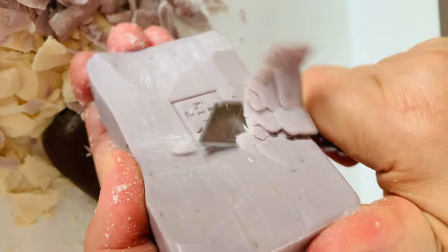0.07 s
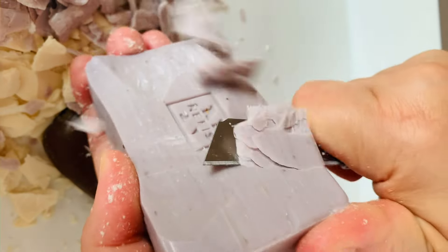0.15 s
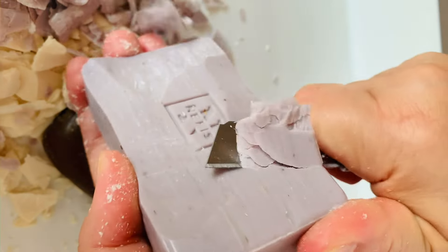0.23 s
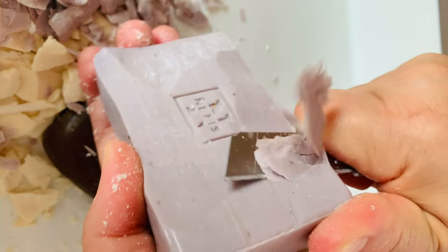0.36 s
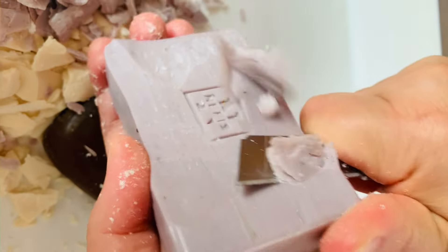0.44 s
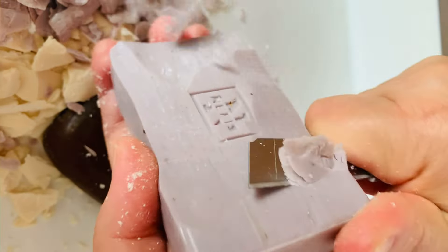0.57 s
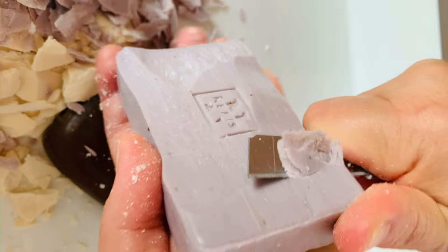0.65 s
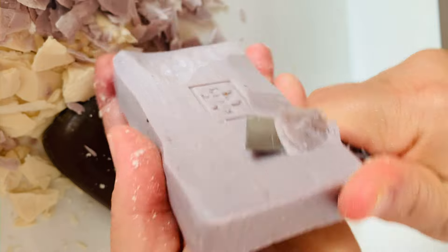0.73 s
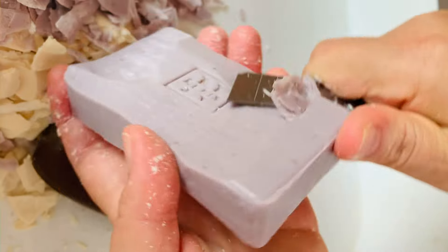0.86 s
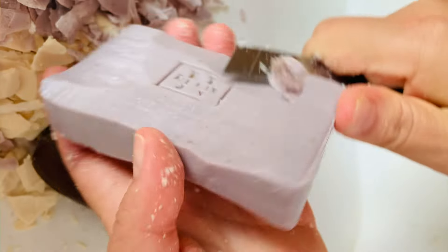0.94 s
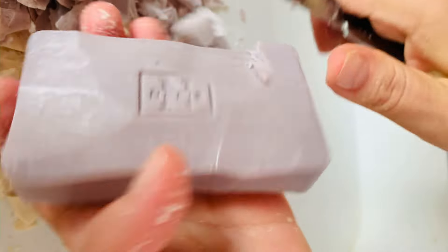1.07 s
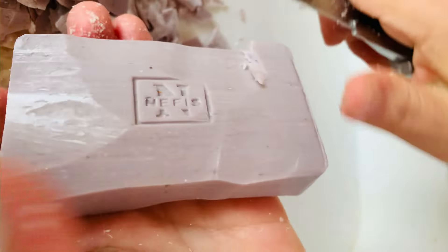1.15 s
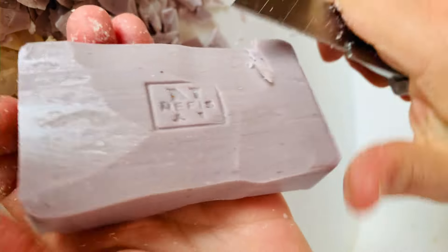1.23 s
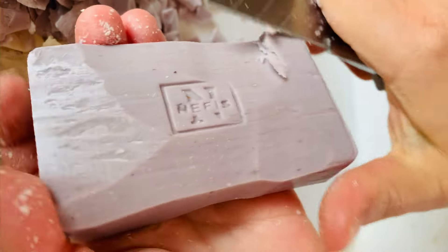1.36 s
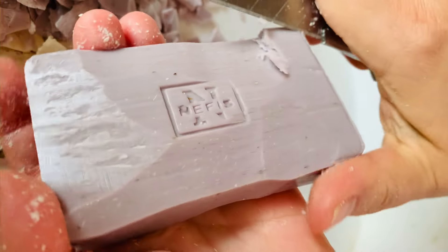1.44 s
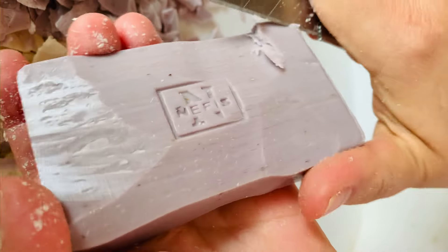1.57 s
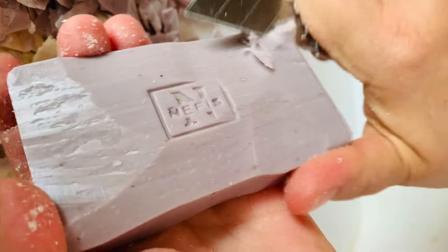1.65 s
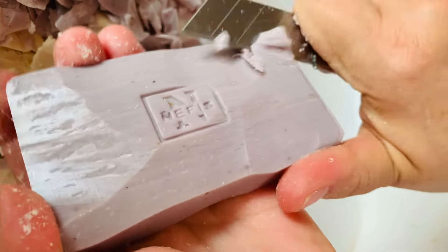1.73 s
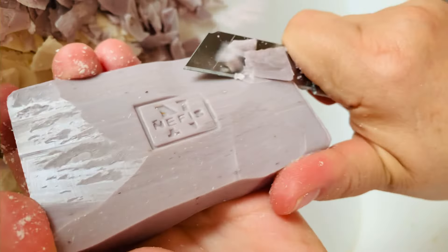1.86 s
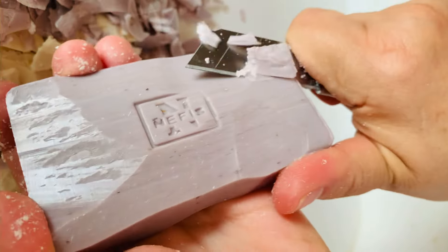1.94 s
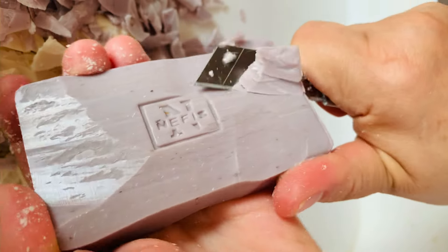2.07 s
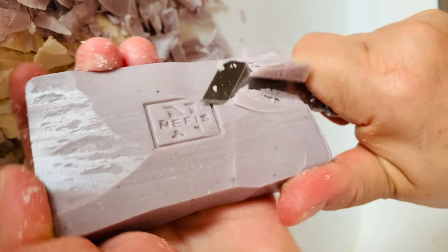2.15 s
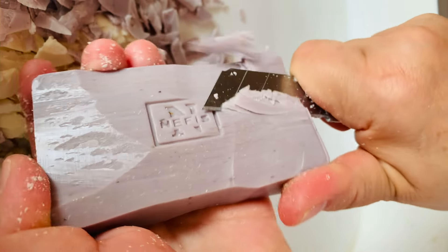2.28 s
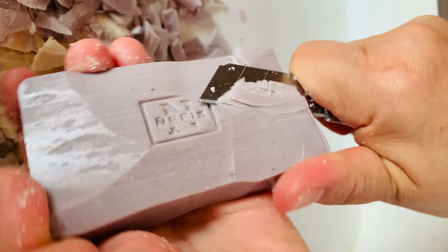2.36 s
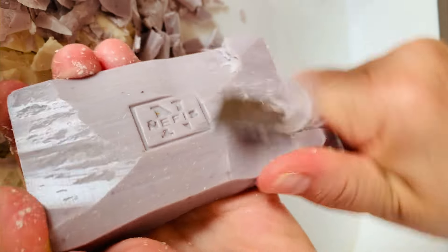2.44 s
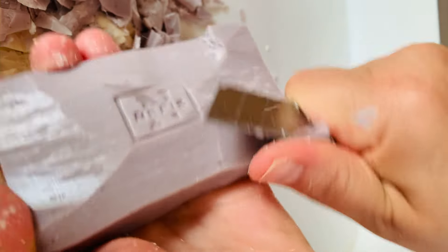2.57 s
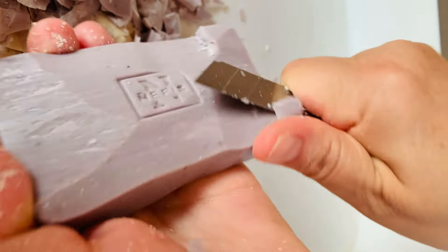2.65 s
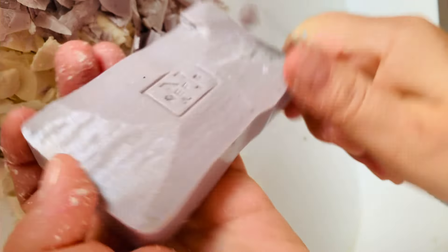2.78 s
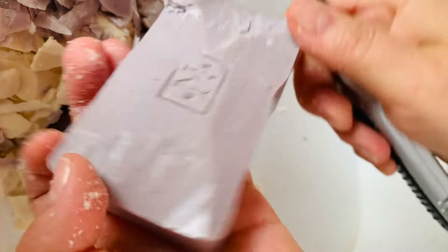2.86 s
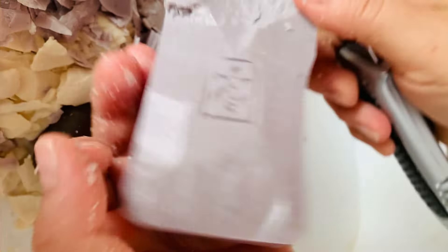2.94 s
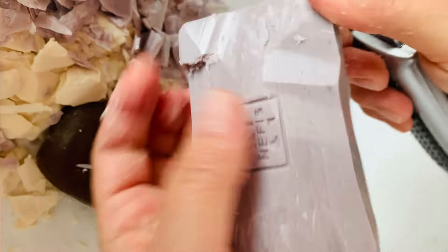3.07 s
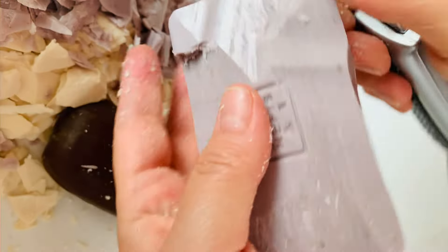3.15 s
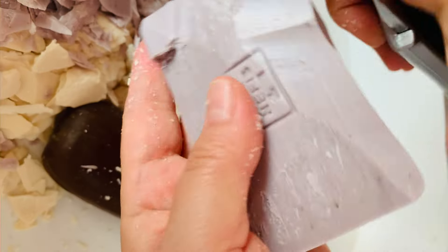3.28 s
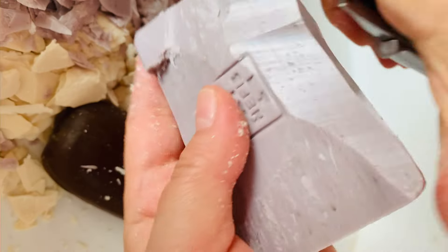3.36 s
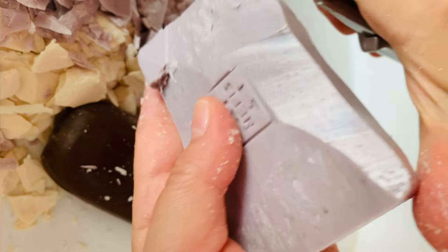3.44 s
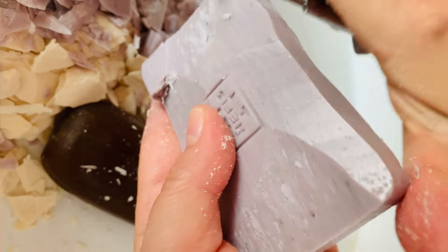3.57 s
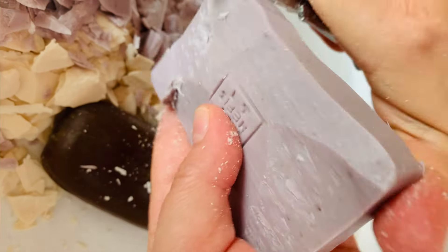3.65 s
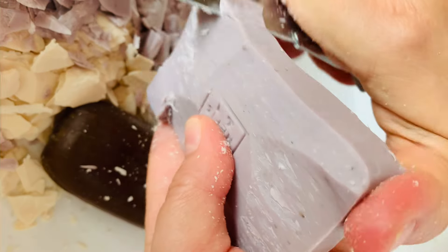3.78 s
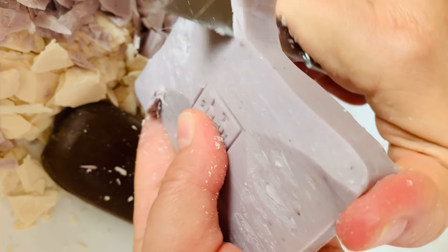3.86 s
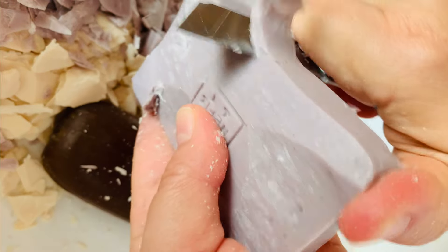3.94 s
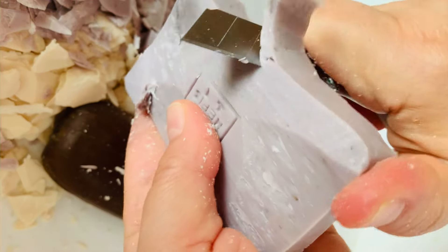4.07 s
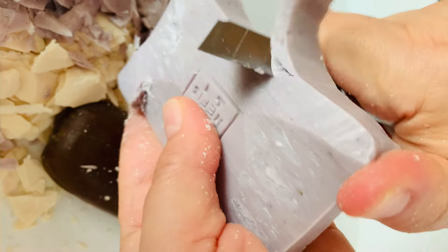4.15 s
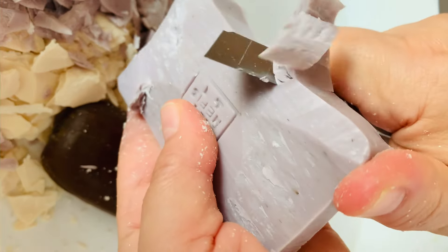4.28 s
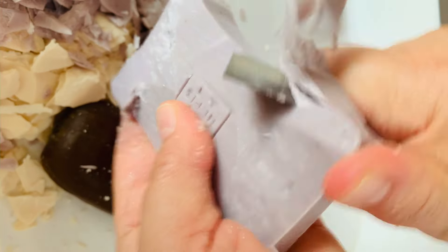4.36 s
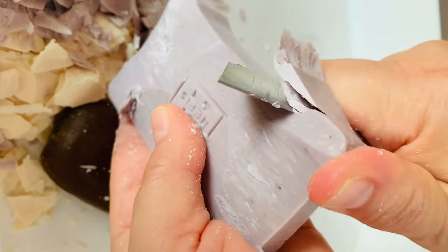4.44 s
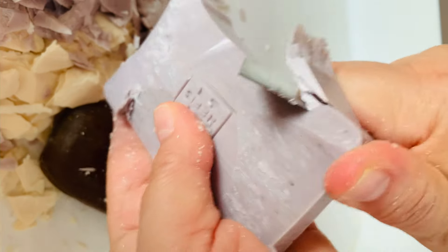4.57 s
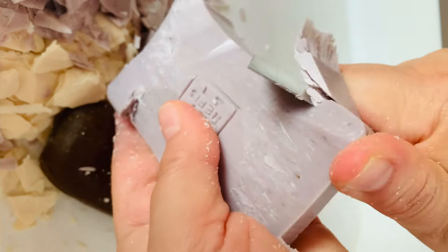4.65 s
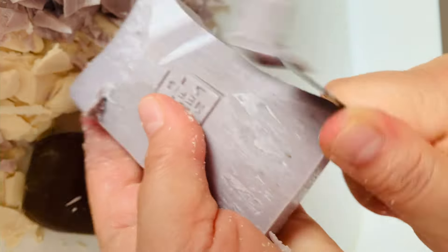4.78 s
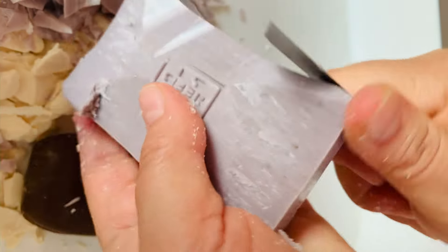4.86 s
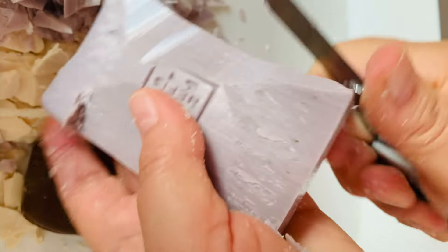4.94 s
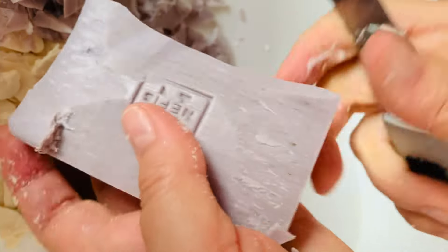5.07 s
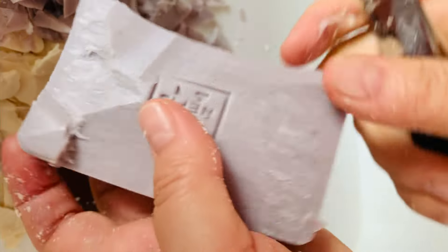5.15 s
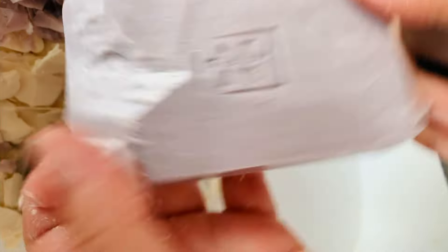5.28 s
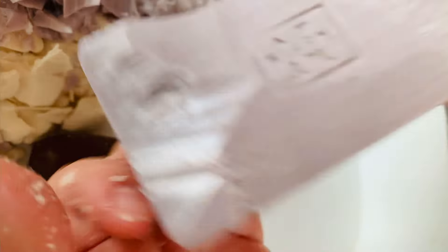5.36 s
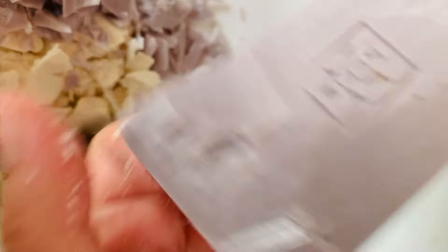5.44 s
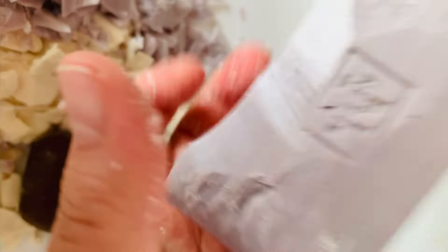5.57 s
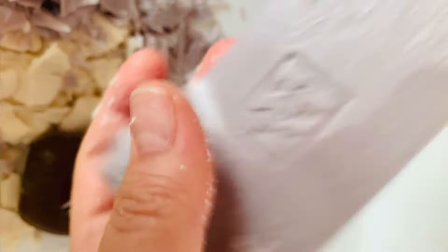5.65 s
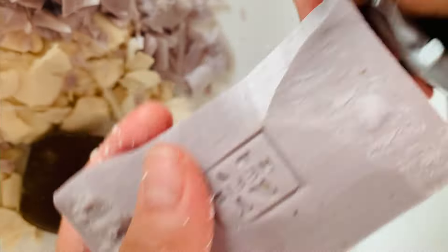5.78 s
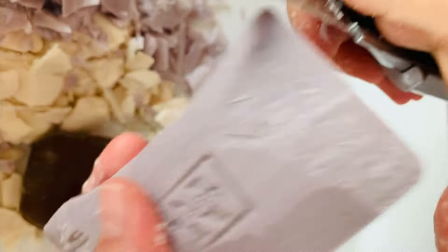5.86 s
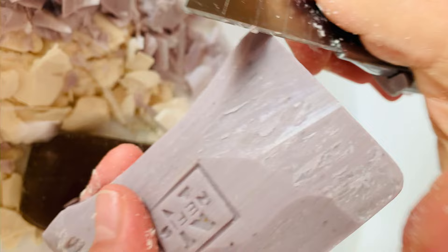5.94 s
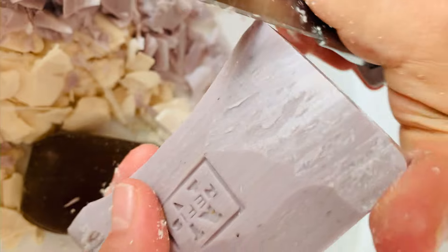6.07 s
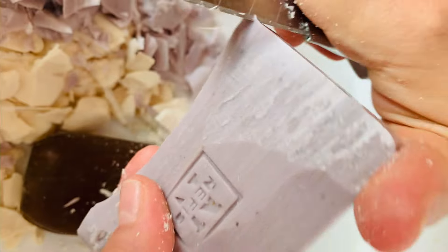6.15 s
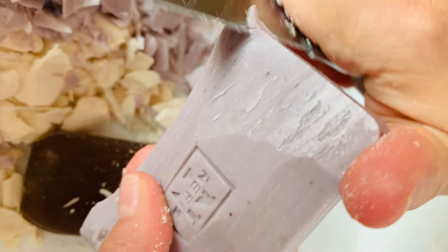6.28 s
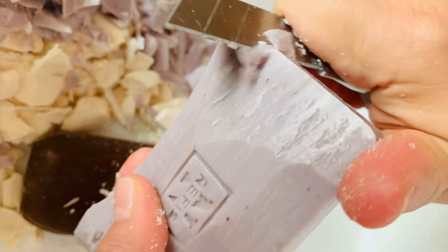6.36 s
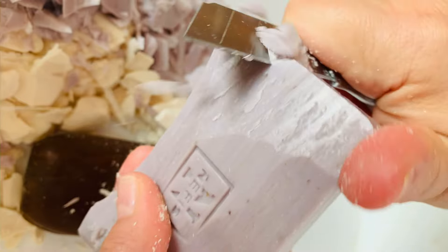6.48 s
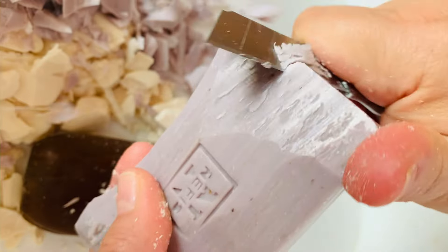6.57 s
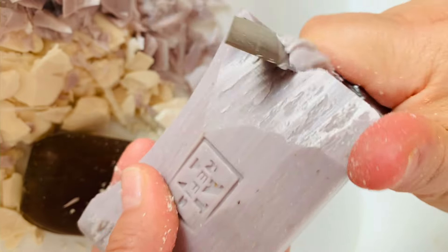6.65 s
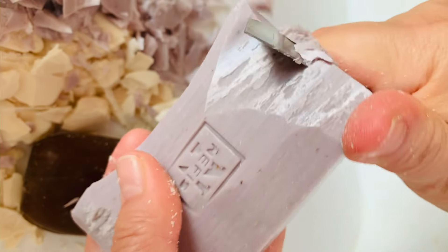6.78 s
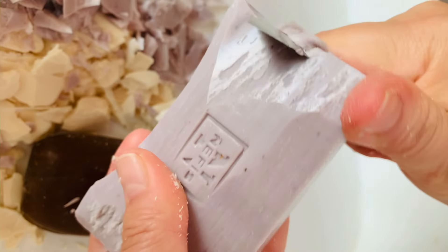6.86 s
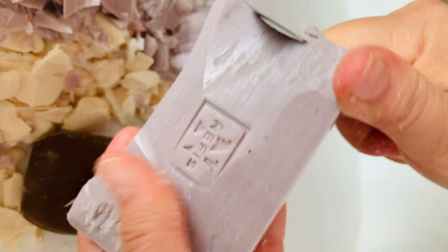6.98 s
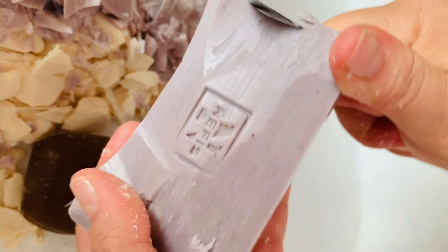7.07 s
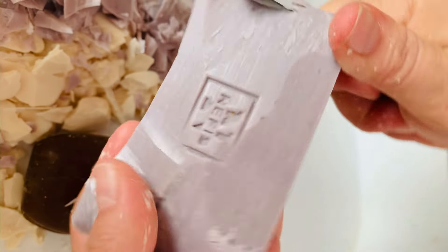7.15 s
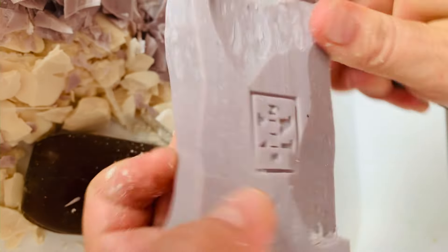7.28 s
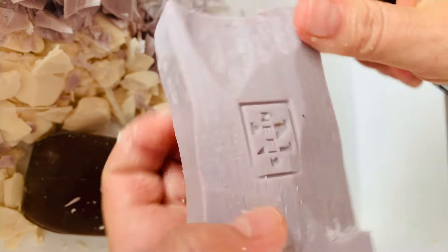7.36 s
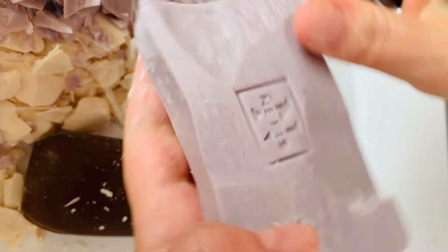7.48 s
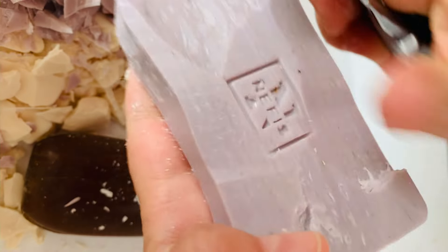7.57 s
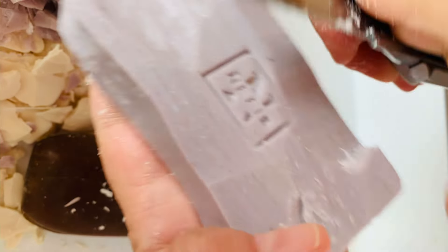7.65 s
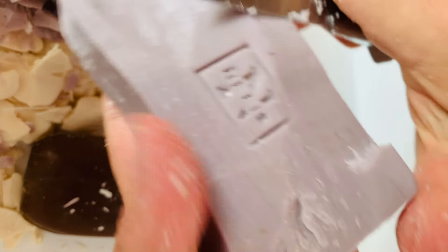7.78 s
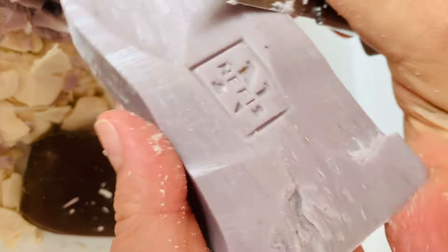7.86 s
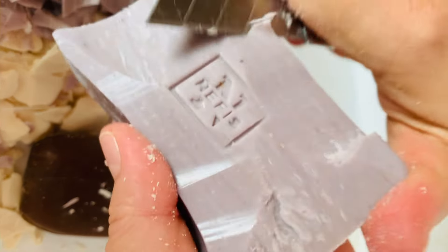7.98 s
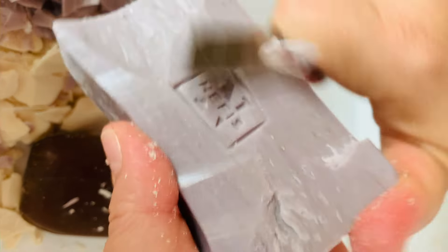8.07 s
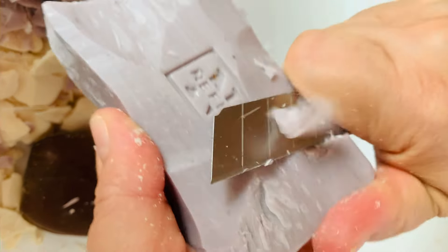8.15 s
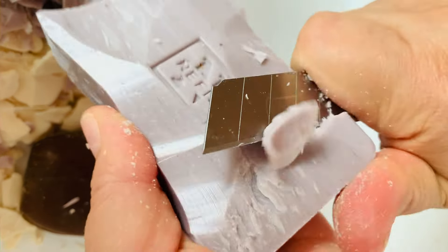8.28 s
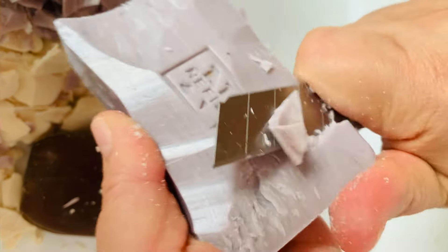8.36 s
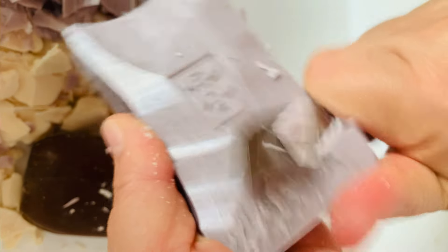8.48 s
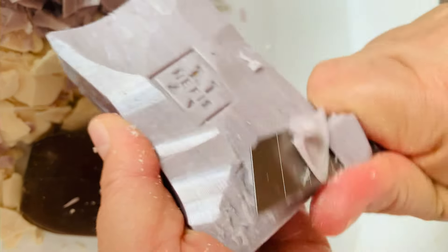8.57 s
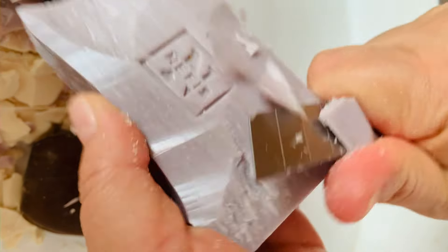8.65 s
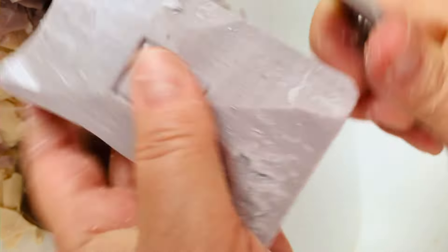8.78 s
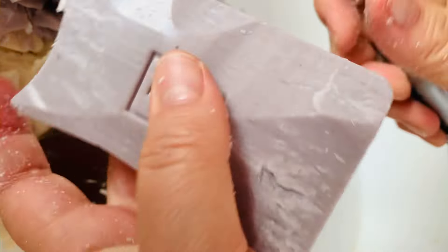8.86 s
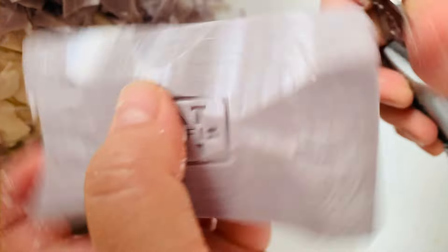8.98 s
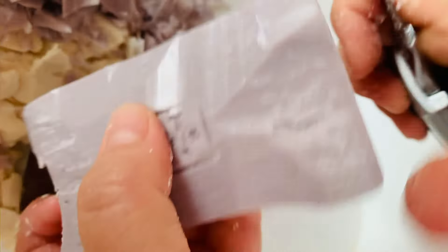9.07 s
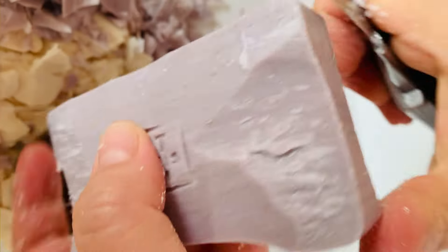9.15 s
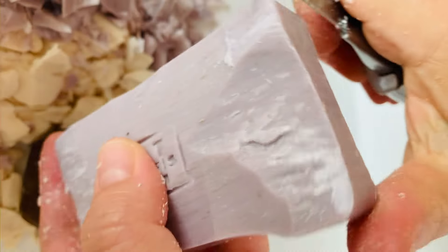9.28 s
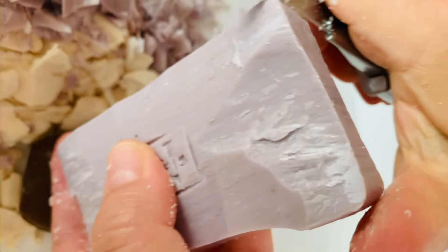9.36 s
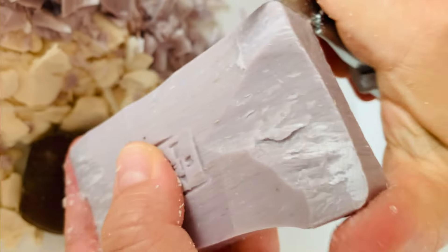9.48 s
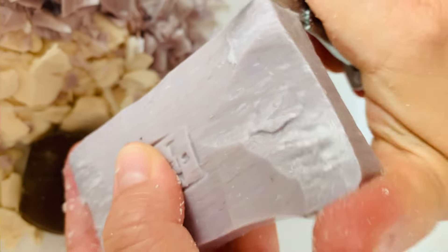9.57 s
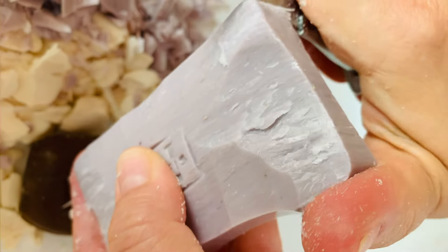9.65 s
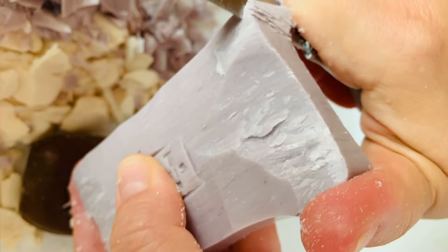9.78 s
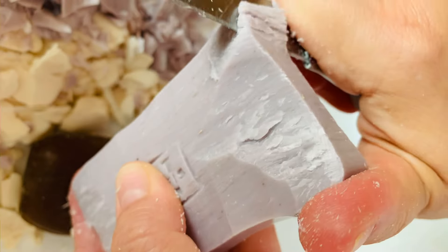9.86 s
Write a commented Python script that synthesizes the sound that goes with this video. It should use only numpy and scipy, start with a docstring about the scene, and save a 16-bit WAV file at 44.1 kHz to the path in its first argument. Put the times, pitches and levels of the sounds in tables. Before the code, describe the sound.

A thin blade scrapes and chips a dry soap bar near the microphone. Delicate crumbly ticks lead to two strong snaps before three seconds, then a cluster of brittle crunches with a deep bump. After a lull, faint crackling returns, followed by crisp breaks and a final knock. Short hard-walled reflections and soft humming air surround it.

```python
"""A knife blade shaves a dry bar of soap in a small, live room, heard by two nearby microphone ports. Grainy
noise rasps and tiny bursts pop at the edge; broken noise bursts crack as curls break off. Chunks knock with
short damped pushes, hands rustle with filtered clicks, low sine waves thump; scuffs ring the knife. A faint hum
and coloured noise fill the room, whose echoes are fading noise."""
import sys
import numpy as np
from scipy import signal
from scipy.fft import rfft, irfft
from scipy.io import wavfile
from scipy.ndimage import uniform_filter1d

SR = 44100
rng = np.random.default_rng(int(sys.argv[2]) if len(sys.argv) > 2 else 0)


def file_out(sig):
    """Save sig as 16-bit WAV at sys.argv[1]."""
    # one column per channel
    cols = np.atleast_2d(sig).T
    # limit, then scale
    lim = np.clip(cols, -1, 1)
    pcm = np.round(lim * 32767).astype(np.int16)
    wavfile.write(sys.argv[1], SR, pcm)


N = 437472
TIME, BINS = np.arange(N) / SR, np.fft.rfftfreq(N, 1 / SR)  # seconds, Hz
BLOW_SAMPLES = SR / 100  # levels of short blows are counted over 10 ms

# strokes of the blade through the soap: (start [s], length [s], rasp level before the overall trim [dB])
STROKES = [(0.084, 0.15, -71.5), (0.277, 0.18, -69.5), (0.554, 0.013, -65), (1.552, 0.091, -68.5),
           (1.678, 0.23, -73.5), (1.985, 0.042, -69.5), (2.155, 0.088, -68), (2.34, 0.079, -66),
           (2.439, 0.12, -60), (3.023, 0.081, -71), (3.841, 0.22, -69.5), (6.242, 0.081, -73),
           (6.43, 0.23, -72), (6.881, 0.035, -68), (7.74, 0.048, -67.5), (8.057, 0.029, -59.5),
           (8.599, 0.093, -73), (8.763, 0.088, -67), (9.687, 0.075, -75)]
# spectrum of breaking soap, before blade and chip shape it: (frequency [Hz], relative level [dB])
CRACK_COLOUR = [(60, -4.5), (350, -3), (900, -15), (1700, -4), (3600, -6), (5000, -1), (6600, 3), (8000, 1),
                (10500, -2), (13000, -4), (15000, -13.5), (16500, -16.5)]
# spectrum of the murmuring air: (frequency [Hz], relative level [dB])
MURMUR = [(20, -34), (35, -12), (50, 8.5), (70, -5.5), (200, -3), (280, -9.5), (560, -17.5), (900, -19.5),
          (1180, -13.5), (1900, -22.5), (2700, -29.5), (5000, -34.5), (14000, -43.5)]


def from_db(db):
    """Turns decibels into gain."""
    return 10 ** (np.asarray(db) / 20)


def read(points, hz):
    """Reads a table of (frequency [Hz], value), joining its points along a log frequency axis."""
    table_hz, value = np.transpose(points)
    return np.interp(np.log(hz + 1), np.log(table_hz + 1), value)


def unit(x):
    """Scales a signal to rms 1."""
    return x / np.sqrt(np.mean(x ** 2) + 1e-20)


def colour(x, points):
    """Filters a signal by a spectrum table and scales it to rms 1."""
    return unit(irfft(rfft(x) * from_db(read(points, BINS)), N))


def drift(per_s):
    """A random value that wanders in straight lines between 3 * per_s points a second, at rms 1."""
    knots = rng.standard_normal(int(per_s * 3 * N / SR) + 2)
    return unit(np.interp(TIME, np.linspace(0, N / SR, len(knots)), knots))


def add(mix, s, sound):
    """Mixes a sound in at time s."""
    part = mix[max(round(s * SR), 0):][:len(sound)]
    part += sound[:len(part)]


def level(rows, attack_db_per_s, release_db_per_s, resting_db):
    """Gain over time of gestures: each swells, holds and dies away to a resting level."""
    level_db = np.full(N, float(resting_db))
    for start, length, db in rows:
        swell_db = (TIME - start) * attack_db_per_s
        fade_db = (start + length - TIME) * release_db_per_s
        level_db = np.maximum(level_db, db + np.minimum(np.minimum(swell_db, fade_db), 0))
    return from_db(level_db)


def crackle(per_s, spread_db):
    """Random clicks of widely differing size, at rms 1."""
    size = from_db(spread_db * np.minimum(rng.exponential(1, N), 4))
    return unit(size * rng.choice([-1, 1], N) * (rng.random(N) < per_s / SR))


def blade(hz):
    """Gain of the thin blade's resonances, which sing under the cut."""
    # resonances: (frequency [Hz], width [Hz], strength [dB])
    blade_modes = [(6920, 1500, 5), (7150, 110, 2), (8170, 150, 5)]
    power = sum(from_db(2 * db) / (1 + (2 * (hz - f) / width) ** 2) for f, width, db in blade_modes)
    return np.sqrt(1 + power)


def background(air_db=-62.0, waver=0.93, waver_db=1.0):
    """Coloured noise makes moving air; sine waves of unsteady phase and level make the hum."""
    # hum tones: (frequency [Hz], average level [dB])
    hum_tones = [(48.6, -66), (197.5, -62.5)]
    air = from_db(air_db) * colour(rng.standard_normal(N), MURMUR)
    hum = np.zeros(N)
    for hz, db in hum_tones:
        strength = from_db(db + waver_db * drift(per_s=5.6))
        hum += strength * np.sin(2 * np.pi * hz * TIME + waver * drift(per_s=5))
    return air + np.sqrt(2) * hum


def crumbs():
    """Tiny crumbs pop off the edge, each a noise burst about a millisecond long."""
    clicks = abs(crackle(per_s=220, spread_db=3.))
    pops = signal.oaconvolve(clicks, np.exp(-TIME[:300] / .001))[:N]
    return unit(pops * rng.standard_normal(N))


def rasp(level_db=-2.5, patchy_db=4.5):
    """The edge sticks and slips through the soap; clumps of uneven grains ring the blade."""
    # spectrum of the rasp: (frequency [Hz], relative level [dB])
    rasp_colour = [(100, -26), (1000, -15), (2500, -8), (5000, -4), (6700, 3), (8500, -7.5), (11000, -9),
                   (14000, -10.5), (16000, -17.5)]
    grains = np.zeros(N)
    # each pitch band gets its own grains and clumps
    for hz in np.geomspace(1500, 15000, num=7):
        clicks = crackle(per_s=2500, spread_db=3.5)
        band = signal.butter(2, [hz / 1.3, hz * 1.3], "band", fs=SR)
        grains += signal.lfilter(*band, clicks * from_db(patchy_db * drift(per_s=10)))
    clumps = grains * from_db(3.5 * drift(per_s=40))
    ringing = irfft(rfft(clumps) * blade(BINS), N)
    # the edge bites in, slips out and then barely touches the bar
    pressure = level(STROKES, attack_db_per_s=349, release_db_per_s=218.5, resting_db=-82)
    edge = .7 * colour(ringing, rasp_colour) + .8 * colour(crumbs(), CRACK_COLOUR)
    return from_db(level_db) * pressure * edge


def small_chips(per_s=55., over_db=0.0, spread_db=3.0, length_s=0.00082, body_db=1.5, bright_spread_db=10.0):
    """Random chips break off during strokes; harder strokes shed louder ones. Rows as for cracks."""
    start, length, db = np.transpose(STROKES)
    # lay the strokes end to end, so that chips fall only within them
    cut_s = np.cumsum(length)
    place, size, thickness, shade = rng.random((300, 4)).T
    due_s = (np.arange(len(place)) + place) / per_s
    stroke = np.searchsorted(cut_s, due_s[due_s < cut_s[-1]])
    rows = []
    for k, due, a, b, c in zip(stroke, due_s, size, thickness, shade):
        s = start[k] + cut_s[k] - due
        chip_db = db[k] + over_db + spread_db * (2 * a - 1)
        chip_body_db = body_db + 10 * (b - .5)
        rows.append((s, chip_db, length_s * (.5 + b), chip_body_db, bright_spread_db * (2 * c - 1)))
    return rows


def cracks(level_db=0., rise=0.18, fall=0.7, spread_db=5.0, crumble_db=-22.5, crumble_s=0.022, even=0.13):
    """Each crack is an avalanche of tiny fractures that builds, breaks and trails off in crumbs."""
    # loud and faint cracks at set times: (time [s], treble level over 10 ms [dB],
    # length before shortening [s], body against treble [dB], added brightness of the treble [dB per octave])
    timed_cracks = [(0.087, -54, 0.0053, -7.5, -7), (0.224, -61, .0026, 8.5, 3),
                    (0.273, -55.5, 0.00069, 1.5, -14), (0.333, -51.5, 0.003, -6, -10),
                    (0.379, -63.5, 0.0021, 4.5, -10), (0.394, -53.5, 0.0017, -19, -21),
                    (0.465, -55.5, 0.0023, -7.5, -5), (0.591, -51, 0.0039, 3.5, -2),
                    (0.613, -52.5, .0006, -17, 10), (1.124, -62, 0.0012, 3, 11),
                    (1.268, -53, 0.00071, 1, 4), (1.628, -53, 0.0042, -1.5, -6),
                    (1.783, -59.5, 0.0033, 1, -9), (1.817, -53.5, .0042, -9, -3),
                    (2.0227, -50, 0.0033, -17, -1), (2.03, -56.5, .002, -19, 6),
                    (2.135, -52, 0.0022, -12, -1), (2.145, -48, 0.0019, -18, -8),
                    (2.212, -52.5, .0015, -12, -19), (2.229, -45, 0.0015, -23, -29),
                    (2.4147, -18, 0.0032, -10.5, 5), (2.445, -28, .0007, -10, 4), (2.458, -47, .009, 5, 0),
                    (2.613, -52.5, 0.00055, 9.5, -9), (2.638, -41.5, 0.00042, 11.5, -4),
                    (2.649, -34.5, .0036, 5.5, -2), (2.656, -37, .0005, 2, -14),
                    (2.712, -34.5, 0.0013, 2, -5), (2.828, -62, .0006, 7, -10), (2.855, -53.5, .0015, 0, 8),
                    (3.295, -66, 0.0021, 0, -3), (3.546, -57.5, 0.0015, 4.5, -5),
                    (3.844, -42.5, 0.0032, -1.5, -3.5), (3.908, -52.5, 0.0044, 2, 3),
                    (4.016, -44.5, 0.0032, -3.5, 7.5), (4.118, -52, 0.0024, -3, 4),
                    (4.136, -49, 0.0027, -1, 5), (4.276, -60, 0.0014, -6.5, 2),
                    (4.36, -34.5, 0.0029, -10, 2), (4.364, -36, 0.0022, -0.5, -3.5),
                    (4.546, -52.5, 0.0024, -0.5, 12), (4.574, -37.5, 0.0039, 1.5, 8.5),
                    (4.704, -40.5, 0.0047, 3, 3.5), (4.818, -61.5, 0.00065, 13.5, -8),
                    (4.861, -44.5, 0.0058, 1, -4), (4.923, -46, 0.00061, -8.5, 1),
                    (5.006, -52.5, 0.0013, -1, -13.5), (5.947, -71.5, .0024, 12, -2),
                    (5.9963, -40.5, 0.002, -8, 0), (6.172, -71, 0.0012, 8.5, -1.5),
                    (6.298, -62.5, .00079, -9, 0), (6.394, -62, 0.0025, 3.5, 7),
                    (6.491, -64.5, .0008, 0, 1), (6.53, -59.5, 0.0018, -8, -2), (6.564, -55, .0014, 2, -25),
                    (6.584, -46, 0.0012, -15, 15), (6.625, -63, .0017, -3, 7.5),
                    (6.648, -59, .003, -0.5, 6.5), (6.722, -59.5, 0.0025, -2.5, 7),
                    (7.015, -56.5, 0.0061, 4.5, -0.5), (7.442, -52, .00088, -8, 0.5),
                    (8.04, -56.5, 0.0044, -0.5, -4), (8.066, -60.5, 0.0065, 7, 1.5),
                    (8.086, -54.5, 0.0061, 3, 0.5), (8.102, -34.5, 0.0026, -8, -1),
                    (8.324, -48, 0.0011, -25.5, 10.5), (8.455, -38, .005, -9, 9.5),
                    (8.483, -42.5, 0.0013, -11, 3.5), (8.962, -44.5, 0.00064, -6.5, 6),
                    (9.058, -65.5, .0012, 15.5, 6), (9.715, -59.5, .0021, -15, 0.5),
                    (9.769, -61, 0.0038, -12, 2.5)]
    out, size = np.zeros(N), 4096
    t, hz = (np.arange(size) - size // 4) / SR, np.fft.rfftfreq(size, 1 / SR)
    treble, body = hz > 5500, (hz > 1500) & (hz < 4500)
    depth = np.interp(hz, [3500, 6500], [1, 0])  # where the body setting acts
    octaves = np.log2(np.clip(hz, 5000, 13000))
    for s, db, length, body_db, bright_db in timed_cracks + small_chips():
        length = max(length - .0004, .0003)
        burst = np.exp(-abs(t) / (length * np.where(t < 0, rise, fall) * 2))
        debris = from_db(crumble_db) * np.exp(-abs(t) / np.where(t < 0, length, crumble_s))
        grain_db = spread_db * np.clip(rng.standard_normal(size), -2, 2)
        grains = rng.standard_normal(size) * from_db(grain_db)
        # every chip has its own shape and so its own colour
        shape_db = 3 * unit(uniform_filter1d(rng.standard_normal(len(hz)), size=70))
        chip_db = bright_db * (octaves - octaves.mean()) + shape_db
        # faint cracks ring the blade, loud ones sound more by themselves
        ring = blade(hz) ** np.interp(db, [-50, -25], [.7, .3])
        spectrum = rfft(grains * (burst + debris))
        # a clean break spreads its energy more evenly over the spectrum
        spectrum /= uniform_filter1d(abs(spectrum) ** 2, size=31) ** (np.clip(even, 0, 1) / 2)
        spectrum *= from_db(read(CRACK_COLOUR, hz) + chip_db) * ring
        spectrum /= np.linalg.norm(spectrum[treble])
        # a thicker chip has more body under its treble
        spectrum *= (from_db(body_db) / np.linalg.norm(spectrum[body])) ** depth
        add(out, s + t[0], irfft(spectrum) * np.sqrt(BLOW_SAMPLES * size / 2) * from_db(db + level_db))
    return out


def rustle(level_db=-2.5, uneven_db=3.5):
    """Fingers shift and rub on the bar and loose flakes slide: uneven clicks, softly coloured."""
    # shifts of grip: (start [s], length [s], level before the overall trim [dB])
    grips = [(0.18, 0.34, -60.5), (0.62, 0.19, -60), (1.02, 0.44, -64), (2.7, 0.048, -45),
             (2.78, 0.11, -47), (2.98, 0.18, -56.5), (3.8, 0.42, -64), (4.72, 0.25, -47),
             (6.38, 0.32, -62.5), (7.02, 0.039, -53.5), (7.43, 0.12, -57), (8.98, 0.074, -48),
             (9.04, 0.075, -47)]
    # spectrum of the rustle: (frequency [Hz], relative level [dB])
    rustle_colour = [(30, -7), (75, 8), (150, 6), (280, 1), (550, 0), (850, -6.5), (1300, -5.5),
                     (2200, -11.5), (4000, -22), (8000, -33.5)]
    grains = crackle(per_s=900, spread_db=2.5) * from_db(uneven_db * drift(per_s=55))
    # between the shifts the hands just hold the bar
    movement = level(grips, attack_db_per_s=247, release_db_per_s=149.5, resting_db=-75)
    return from_db(level_db) * movement * colour(grains, rustle_colour)


def knocks(level_db=-4.5, cycles=0.81, grit=0.78, grit_s=0.0017, scatter=0.17, scatter_s=0.02,
           weight=0.05, weight_hz=165):
    """A short damped push crushes flakes, scatters a few and sets shared modes ringing."""
    # chunks snapping off or landing: (time [s], level before the overall trim [dB], pitch [Hz])
    chunks = [(0.2749, -41, 510), (0.291, -43, 557), (0.314, -40, 804), (0.5916, -44, 750),
              (1.2696, -41.5, 624), (2.6475, -25.5, 1445), (2.6491, -11.5, 864), (2.6566, -19.5, 579.4),
              (2.663, -22.5, 398), (2.7119, -30, 1094), (2.7345, -30.5, 1270), (2.8012, -38.5, 1090),
              (2.8562, -41.5, 706), (3.024, -43.5, 312), (3.1063, -51, 940), (4.3636, -45, 870),
              (4.5784, -28, 804), (4.709, -24, 1160), (4.727, -31.5, 1035), (4.7289, -24, 255),
              (4.8653, -38.5, 744), (4.986, -27, 789), (5.0136, -38, 923), (7.018, -45, 601),
              (7.034, -35.5, 167), (7.048, -42.5, 1023), (7.4328, -39, 868), (7.445, -42, 895),
              (8.1005, -37, 3520), (8.1028, -47, 541.5), (8.4615, -48, 1121), (8.9646, -27.5, 554),
              (9.0239, -42, 507), (9.0988, -40.5, 499)]
    # what a knock rings with: (frequency [Hz], relative level [dB], time to fall 60 dB [s])
    knock_modes = [(336.8, -28.5, 0.053), (407, -17.5, 0.065), (542, -15.5, 0.028), (993, -21, 0.022),
                   (1116, -18.5, 0.04), (1510, -21.5, 0.0053)]
    out, t = np.zeros(N), np.arange(SR // 8) / SR
    ring = np.zeros(len(t))
    for hz, db, t60 in knock_modes:
        ring += 0.13 * from_db(db - 60 * t / t60) * np.cos(2 * np.pi * hz * t)
    for s, db, hz in chunks:
        push_s = max(cycles / (2 * hz), BLOW_SAMPLES / SR / 30)
        push = np.sin(2 * np.pi * hz * t) * hz * t * np.exp(-t / push_s)
        band = signal.butter(2, np.minimum(hz, 1500) * np.array([.5, 1.7]), "band", fs=SR)
        flakes = signal.lfilter(*band, rng.standard_normal(len(t)) ** 3)
        # small, high-pitched chips carry too little weight to crush many flakes
        heft = min(1, 1300 / hz) ** 3
        # the flakes give way in clumps
        flakes *= from_db(4 * drift(per_s=90)[:len(t)])
        crush = grit * np.exp(-t / grit_s) + scatter * np.exp(-t / scatter_s)
        blow = push / abs(push).max() + heft * unit(flakes) * crush
        blow += heft * weight * np.sin(2 * np.pi * weight_hz * t) * np.exp(-t / 0.053)
        blow = blow + signal.fftconvolve(blow, ring)[:len(t)]
        strength = from_db(db + level_db) * np.sqrt(BLOW_SAMPLES) / np.linalg.norm(blow[:SR // 150])
        add(out, s, strength * blow)
    return out


def thumps(level_db=3.5, swell_s=0.013, sag=1.0, sag_s=0.0019, rough=0.37, upper=0.4):
    """Damped low booms with a brief overtone; they swell unevenly as pitch settles."""
    # dull thumps: (time [s], level before the overall trim [dB], pitch it settles to [Hz])
    booms = [(0.281, -42.5, 116.3), (0.602, -46.5, 81), (0.647, -44.5, 76), (0.755, -36, 68.7),
             (0.8, -42.5, 55), (1.139, -47, 79.7), (1.181, -48, 74.6), (1.282, -46, 89.4),
             (2.376, -44.5, 85.45), (2.662, -35.5, 90.1), (2.703, -38.5, 93.6), (3.033, -42, 64.45),
             (3.074, -47, 72.9), (3.118, -41.5, 65.2), (4.145, -37.5, 85.8), (4.59, -40.5, 111.3),
             (4.722, -18.5, 80.3), (4.817, -37.5, 81.4), (4.894, -41, 68.4), (6.661, -51.5, 81.3),
             (6.905, -48.5, 79.8), (7.015, -46, 97.6), (8.972, -41.5, 101.4), (9.041, -40, 82.3),
             (9.167, -46.5, 81.4), (9.852, -44.5, 77.3)]
    out, t = np.zeros(N), np.arange(SR // 4) / SR
    swell = (t / swell_s * np.exp(1 - t / swell_s)) ** 0.8
    for s, db, hz in booms:
        angle = 2 * np.pi * np.cumsum(hz * (1 + sag * np.exp(-t / sag_s))) / SR
        overtone = upper * np.exp(-t / swell_s / 2) * np.sin(2 * angle)
        add(out, s, from_db(db + level_db) * np.sqrt(2) * swell * (np.sin(angle) + overtone))
    uneven = out * (1 + rough * drift(per_s=25))
    return signal.lfilter(*signal.butter(2, 40, "high", fs=SR), uneven)


def taps(grit=0.15, touch=0.25, rub_db_per_octave=18.0, bend=0.059, waver=0.019):
    """Scuffs ring the knife: short ones tap, longer ones rub its upper modes; pitch wavers and bends up."""
    # knife against bar: (time [s], loudest level over 10 ms [dB], scuff length [s], pitch against modes [ratio])
    scuffs = [(0.778, -57, .005, .95), (0.956, -56, 0.013, 0.99), (1.011, -52.5, 0.016, 1.01),
              (1.043, -62, 0.015, 0.86), (1.35, -44, 0.0064, .98), (2.987, -61.5, 0.0044, 0.97),
              (3.398, -57.5, 0.01, 1.02), (7.271, -56, 0.0098, 0.96)]
    # what the knife rings with: (frequency [Hz], relative level [dB], time to fall 60 dB [s])
    knife_modes = [(1100, 12, 0.057), (2086, 1, 0.014), (2990, -9, 0.02)]
    out, t = np.zeros(N), np.arange(SR // 6) / SR
    for s, db, scuff_s, pitch in scuffs:
        tilt = rub_db_per_octave * np.interp(scuff_s, [.004, .012], [0, 1])
        ring = np.zeros(len(t))
        for hz, mode_db, t60 in knife_modes:
            fade_db = mode_db + tilt * np.log2(hz / 1000) - 60 * t / t60
            ring += from_db(fade_db) * np.cos(2 * np.pi * hz * t)
        scuff = rng.standard_normal(len(t)) * np.exp(-t / scuff_s) * (1 - np.exp(-t / (touch * scuff_s)))
        ringing = signal.fftconvolve(scuff, ring)[:len(t)]
        # reading the ringing at a changing speed bends its pitch
        speed = pitch * (1 + bend * np.tanh(t / .04) + waver * drift(per_s=71)[:len(t)])
        sound = unit(np.interp(np.cumsum(speed) / SR, t, ringing)) + grit * unit(scuff)
        loudest = np.sqrt(uniform_filter1d(sound ** 2, size=int(BLOW_SAMPLES)).max())
        add(out, s, from_db(db) * sound / loudest)
    return out


def room(x, build_s=0.0019):
    """Reflections off hard walls arrive in clumps, each band dying at its own speed."""
    # time for echoes to fall 60 dB: (frequency [Hz], time [s])
    room_t60 = [(80, 0.8), (300, 0.3), (1200, 0.39), (2200, 0.46), (4300, 0.47), (7000, 0.45),
                (15000, 0.22)]
    # strength of the echoes: (frequency [Hz], level [dB])
    room_send = [(80, -15.5), (300, -3.5), (900, -10), (1400, -9.5), (2200, -7.5), (3600, -6.5),
                 (7000, -17.5), (15000, -18)]
    echoes = unit(rng.standard_normal(SR) * from_db(2.5 * drift(per_s=70)[:SR]))
    hz, t, bands = signal.stft(echoes, SR, nperseg=256)
    t60 = read(room_t60, hz)[:, None]
    fade = from_db(read(room_send, hz)[:, None] - 60 * t / t60)
    # the last factor evens out the energy of long and short tails
    bands *= fade * np.sqrt(2 * np.log(1000) / (t60 * SR))
    tail = signal.istft(bands, SR, nperseg=256)[1][:SR] * (1 - np.exp(-TIME[:SR] / build_s))
    return signal.fftconvolve(x, tail)[:N]


def reflections(x):
    """The echoes turn between two random sets once a second, so the room rings less."""
    angle = 2 * np.pi * TIME
    return room(x * np.cos(angle)) + room(x * np.sin(angle))


def room_level(around_db=-1.5, dip_at_s=8.08, dip_db=-21, fall_s=0.054, return_s=0.17):
    """Gain of the room's sound: steady but for one quick dip with a slow return."""
    since = np.maximum(TIME - dip_at_s, 0)
    # the return already works during the fall, so the dip stays shallower than dip_db
    return from_db(around_db + dip_db * np.minimum(since / fall_s, 1) * np.exp(-since / return_s))


def ports(x, apart):
    """Two ports hear one sound with different phase and level, and part of the room with opposite sign."""
    # phase between the ports: (frequency [Hz], lead of the left [radians])
    port_phase = [(0, 0), (300, -.45), (750, -.7), (950, -.1), (1500, 0), (2250, .7), (2500, 2.0),
                  (3300, 2.2), (4200, 2.0), (5050, 3.14), (7600, 6), (9400, 6.45), (11200, 8.9),
                  (13500, 9.6), (14700, 12)]
    # balance of the ports: (frequency [Hz], left minus right [dB])
    port_balance = [(60, 1.3), (150, .7), (500, -3.5), (2200, -3.5), (4000, 0)]
    # each port takes half of the difference
    half = from_db(read(port_balance, BINS) / 2) * np.exp(1j * read(port_phase, BINS) / 2)
    return irfft(rfft(np.array([x + apart, x - apart])) * np.array([half, 1 / half]), N)


def scene(apart_db=-7.5, loose_air_db=-60.0):
    """Soap sounds, their reflections and the background; part of the room differs between the ports."""
    soap = cracks() + knocks() + taps() + thumps() + rasp() + rustle()
    around = room_level()
    # apart_db also lowers the loose air
    loose_air = from_db(loose_air_db) * colour(rng.standard_normal(N), MURMUR)
    diffuse = from_db(apart_db) * around * (reflections(soap) + loose_air)
    return ports(soap + around * (reflections(soap) + background()), diffuse)


def record(dry, edge_hz=16200):
    """The recorder's band limit: a steep filter removes the highest treble."""
    lowpass = signal.firwin(511, edge_hz, window=("kaiser", 9), fs=SR)
    return signal.oaconvolve(dry, lowpass[None], "same")


dry = scene()
out = record(dry)
file_out(out)
```